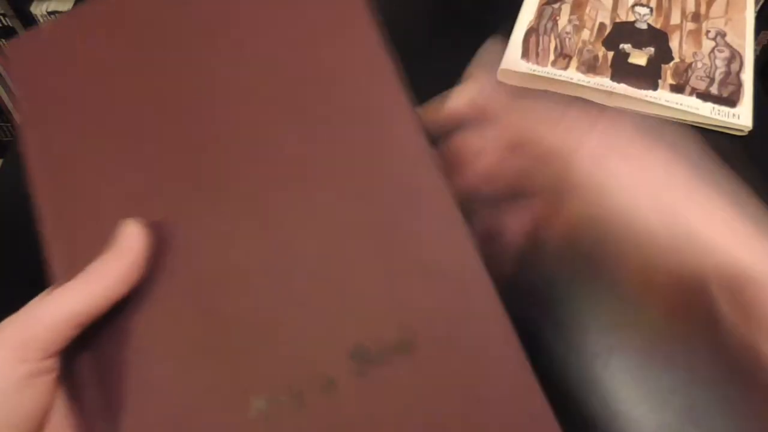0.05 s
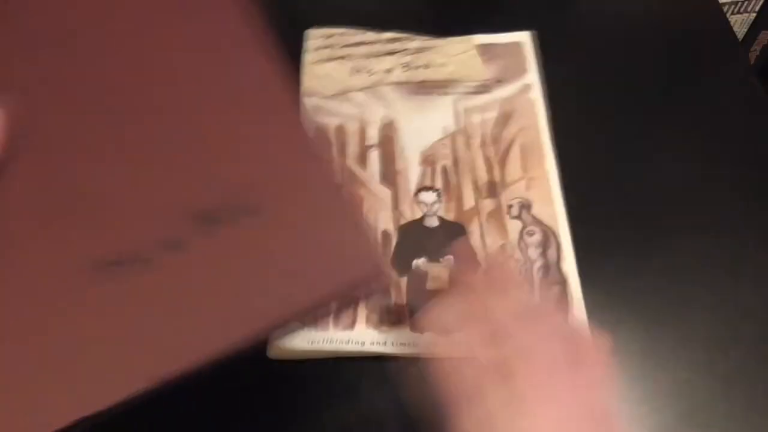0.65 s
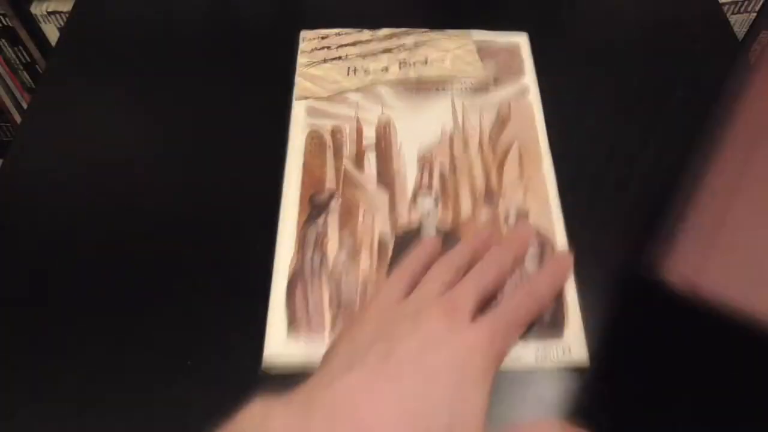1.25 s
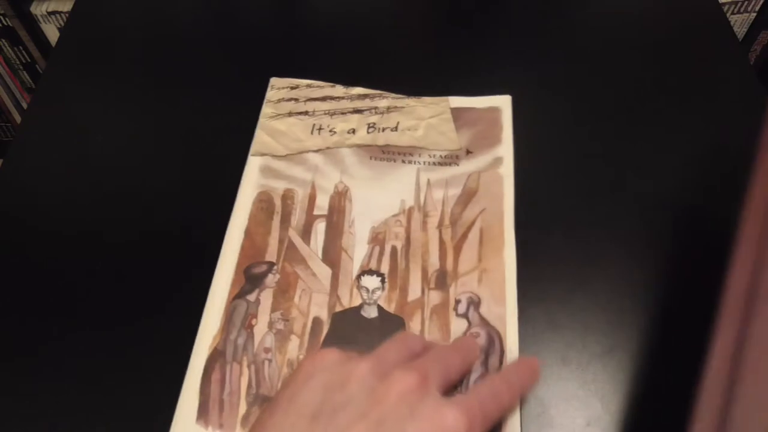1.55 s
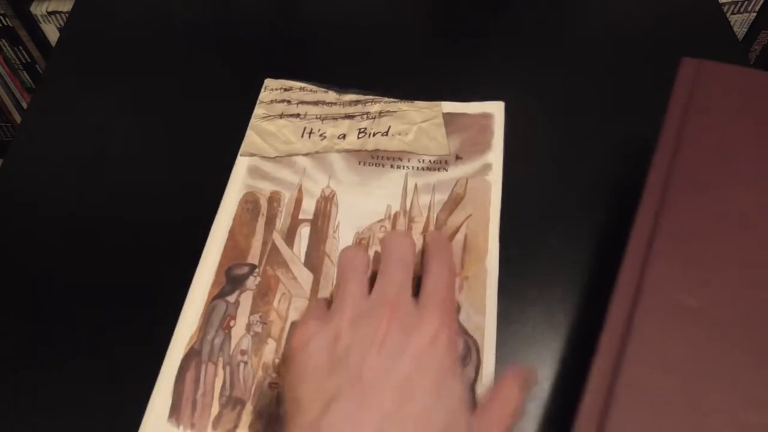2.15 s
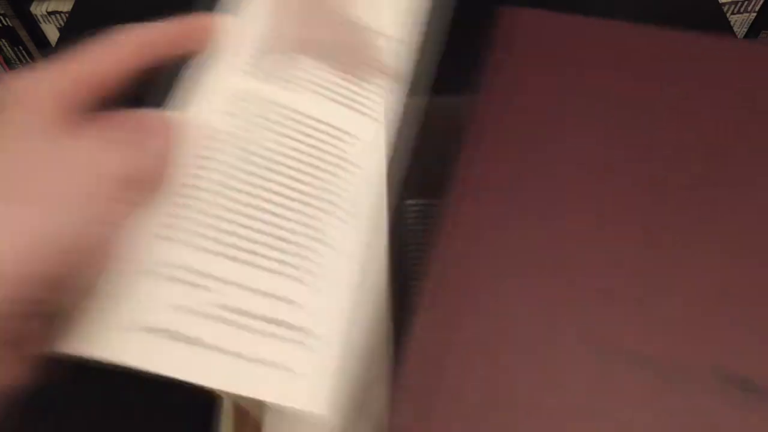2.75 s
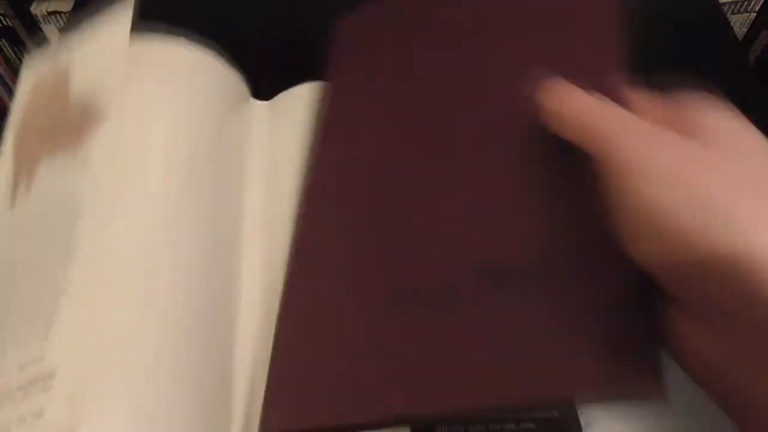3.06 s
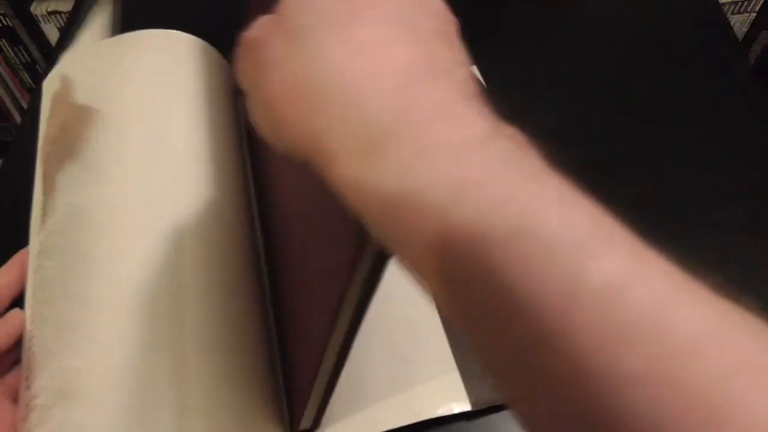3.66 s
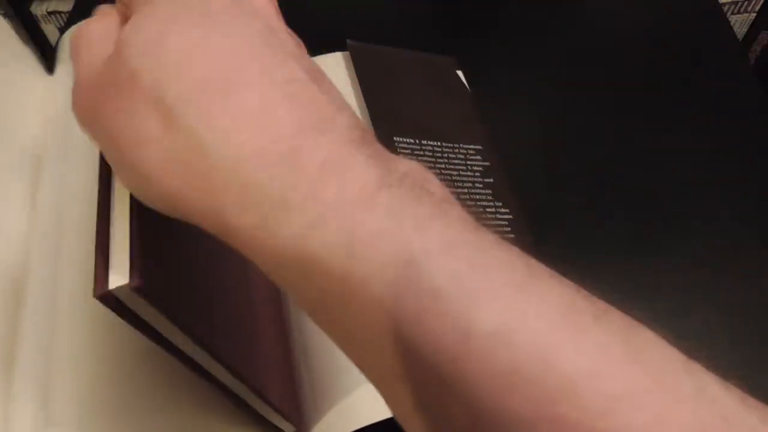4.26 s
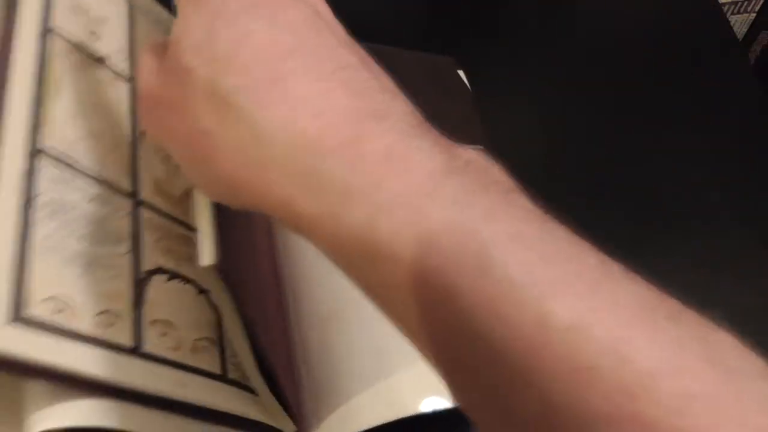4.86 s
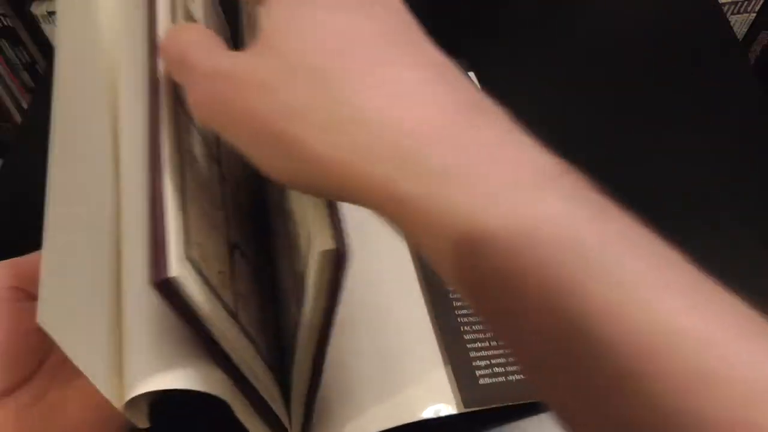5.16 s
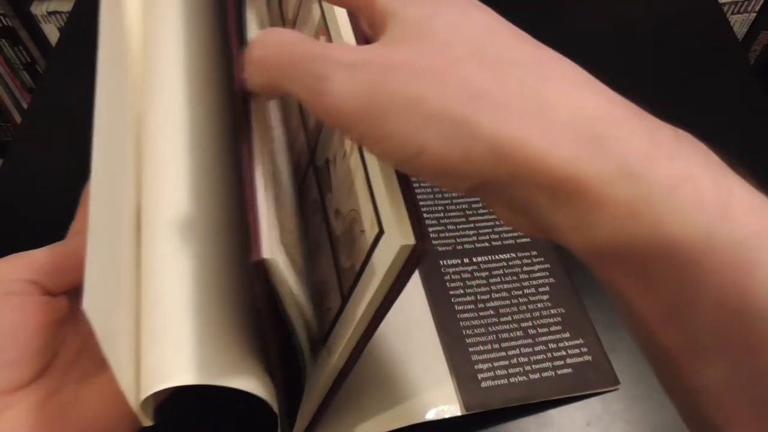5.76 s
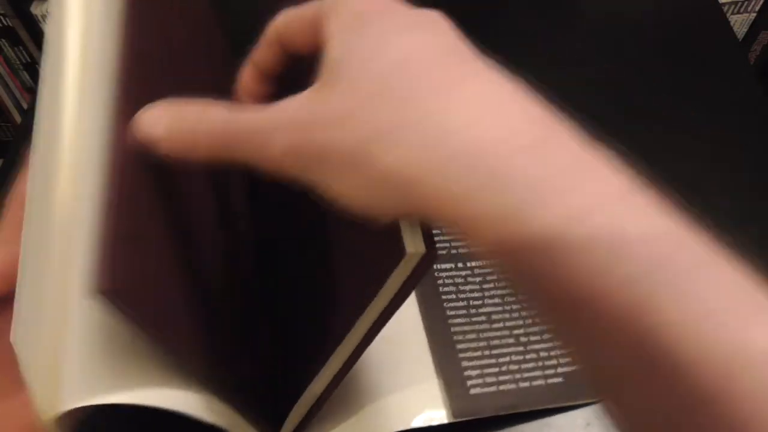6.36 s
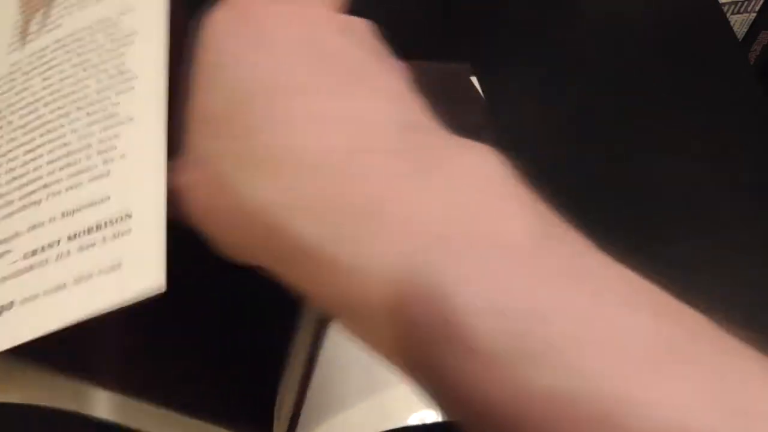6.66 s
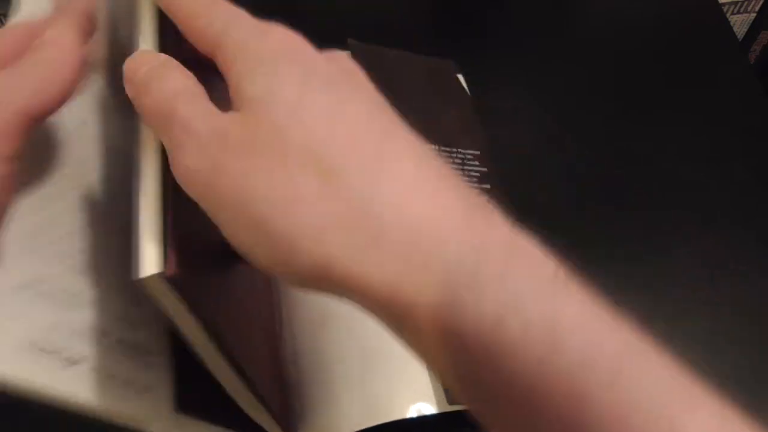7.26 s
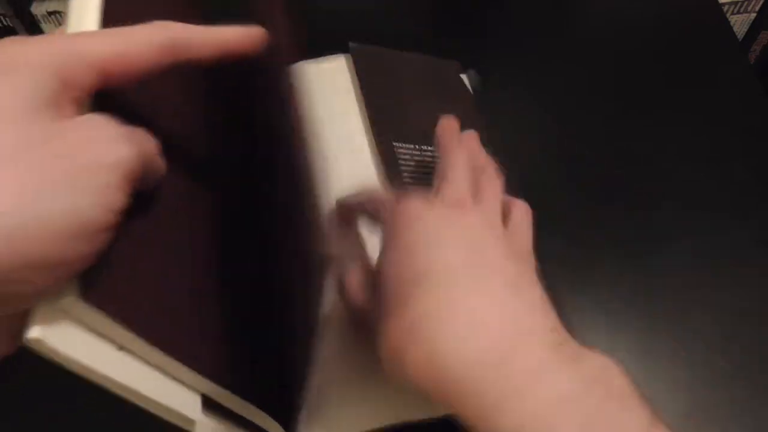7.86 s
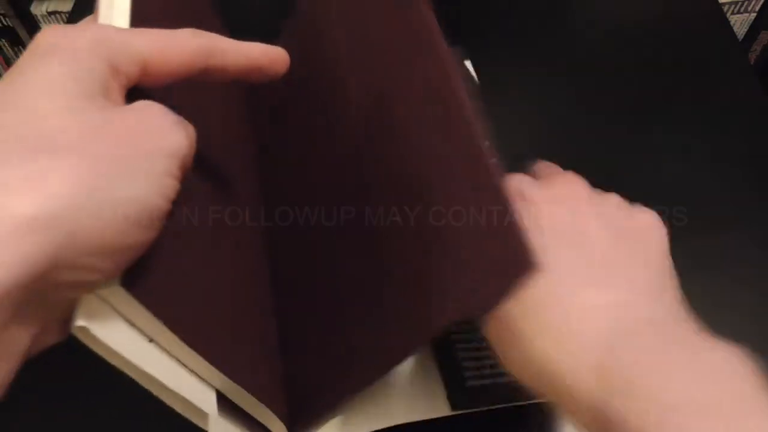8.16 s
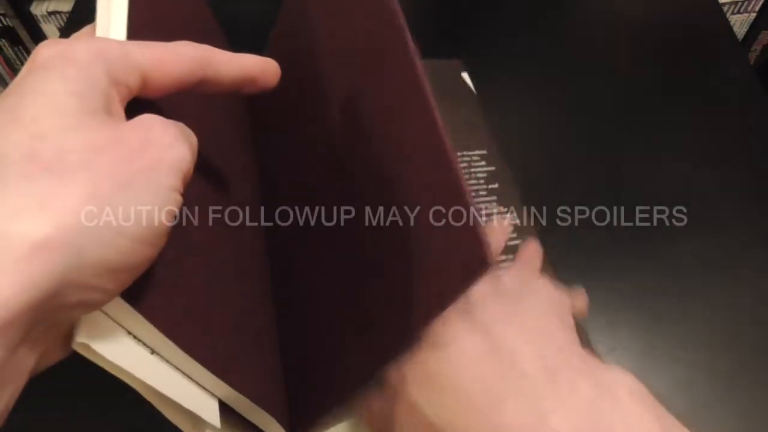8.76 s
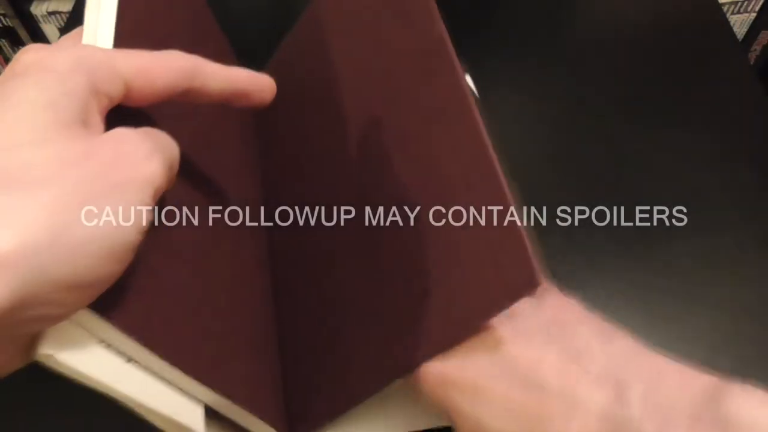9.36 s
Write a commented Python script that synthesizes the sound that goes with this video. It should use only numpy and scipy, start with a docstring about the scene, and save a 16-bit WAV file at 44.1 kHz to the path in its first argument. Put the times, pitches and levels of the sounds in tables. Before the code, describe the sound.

Close to the microphone in a small, quiet room, hands handle a hardcover book and its glossy paper jacket. Three short, bright swishes come first, mixed with sharp snaps and soft bumps on the table. A softer stretch of rubbing boards, whispering fingertips and occasional knocks follows, with one thin, high tick. Near the end the covers clack more loudly in two bunches while paper cracks, settling into light rustling.

```python
"""A snap of paper, a brush of fingertips and a knock: two hands move a hardcover book about on a table
in a small quiet room. Sliding friction makes the glossy jacket swish, the boards rub and the pages
scrape. Impacts excite damped modes, heard as knocks of the covers and thuds of the table top.
Paper and spine snap as they let go, and the jacket's film ticks as it buckles."""
import sys
import numpy as np
from scipy import signal
from scipy.fft import rfft, irfft, next_fast_len
from scipy.io import wavfile
from scipy.ndimage import uniform_filter1d

SR = 44100
rng = np.random.default_rng(int(sys.argv[2]) if len(sys.argv) > 2 else 0)


def transcribe(signal):
    """Save signal, clipped to [-1, 1], as a 16-bit WAV file at the path in sys.argv[1]."""
    frames = np.atleast_2d(signal).T
    limited = np.clip(frames, -1, 1)
    pcm = np.round(limited * 32767).astype(np.int16)
    wavfile.write(sys.argv[1], SR, pcm)


N = 415422
TIME = np.arange(N) / SR
HIT_TIME = np.arange(16384) / SR

# Levels in the tables are relative: each source sets its own overall gain.
# light rubbing of hands that never hold the book quite still: time_s, level_db
STIRRING = [(0, -73.5), (0.85, -112), (1.7, -64), (2.15, -76), (2.75, -63.5), (3.0, -67.5), (3.65, -60),
            (4.15, -67), (4.42, -70.5), (4.9, -62.5), (5.5, -71.5), (6.2, -76.5), (6.65, -54.5),
            (7.45, -63.5), (7.66, -69.5), (8.25, -71), (8.6, -58.5), (9.41, -66)]
# fingers sweep over paper: peak_s, level_db, rise_s, fall_s, edges_relative_db
FINGER_SWIPES = [(0.033, -45, 0.0068, 0.016, -32), (0.112, -51, 0.061, 0.029, -8.5),
                 (0.24, -67, 0.058, 0.079, -6), (1.005, -60, 0.018, 0.056, -15),
                 (1.89, -50.5, 0.061, 0.045, 1), (1.982, -49, 0.028, 0.04, 3), (2.23, -51, .026, 0.089, -8),
                 (2.575, -54.5, 0.089, 0.044, -0.5), (2.86, -44.5, 0.058, 0.081, -4.5),
                 (3.025, -56, 0.037, 0.028, 3), (3.75, -48.5, 0.092, 0.069, -3),
                 (4.055, -57, 0.023, 0.026, -15), (6.64, -65, 0.021, 0.018, 9),
                 (6.73, -61.5, 0.057, 0.025, 10), (6.86, -57, 0.02, 0.092, 0),
                 (7.168, -51, 0.04, 0.014, 1.5), (7.26, -54.5, 0.068, 0.042, -7.5),
                 (7.41, -56.5, 0.026, 0.03, -31), (7.56, -58, 0.033, 0.024, -10),
                 (7.75, -56.5, 0.024, 0.038, -1), (8.165, -57.5, 0.043, 0.028, 1.5),
                 (8.465, -59.5, 0.039, 0.071, -20), (8.67, -58.5, 0.094, 0.049, -2.5),
                 (8.91, -54, 0.1, 0.13, -22), (9.03, -56.5, 0.025, 0.064, -21),
                 (9.215, -52, 0.083, 0.039, -8.5), (9.31, -57.5, 0.088, 0.04, -4.5)]
# a board is pushed along the pages: peak_s, level_db, rise_s, fall_s, edges_relative_db
BOARD_PUSHES = [(1.06, -63, 0.12, 0.03, 6.5), (2.215, -60, 0.022, 0.051, 11),
                (2.42, -54.5, 0.028, 0.024, -8), (2.79, -61, 0.018, 0.051, 5),
                (3.085, -57.5, 0.03, 0.054, 4), (3.2, -52.5, 0.13, 0.15, -3),
                (3.335, -45, 0.12, 0.058, -1.5), (3.43, -53, 0.012, 0.099, -7),
                (3.56, -58, 0.032, 0.062, 4), (3.84, -49, 0.041, 0.035, -3), (4.025, -56, 0.19, 0.098, -5),
                (4.27, -53, 0.078, 0.041, -23), (4.695, -64, 0.041, 0.052, 3.5),
                (4.81, -58, 0.04, 0.068, -2.5), (5.015, -43, 0.053, 0.042, -10),
                (5.16, -55, 0.11, 0.068, -9.5), (5.82, -61, 0.047, 0.066, -4.5),
                (6.44, -46, 0.11, 0.092, -6), (6.74, -50.5, 0.032, 0.32, -11.5),
                (6.845, -46, 0.035, 0.013, -2), (6.995, -41, 0.052, 0.037, -10),
                (7.17, -51, 0.024, 0.054, -10), (7.325, -56, 0.041, 0.097, -32),
                (7.92, -57.5, 0.18, 0.13, -36), (8.14, -49, 0.11, 0.053, -12),
                (8.37, -53, 0.058, 0.051, -15), (8.51, -52, 0.035, 0.025, -22),
                (8.86, -51.5, 0.067, 0.086, -9.5), (8.985, -53, 0.1, 0.19, -4.5)]
# friction spectra, each with the columns: frequency_hz, density_db
EDGE_SPECTRUM = [(500, -11), (1500, 2.5), (1900, 0.5), (2250, 8.5), (2600, -1.5), (3000, 4), (3900, 4),
                 (4700, 3), (5700, -4.5), (7500, -2), (13000, -10), (15800, -47)]  # page edges
FINGER_SPECTRUM = [(1500, -71), (4000, -1.5), (5800, -3.5), (7000, 2), (8100, 2), (9000, -2.5), (10000, -3),
                   (12500, -2.5), (14000, -11), (15800, -25)]  # fingertips on paper
LIGHT_RUB_SPECTRUM = [(40, -17), (100, -7), (170, -2), (290, -2), (350, -7.5), (420, -0.5), (510, -11),
                      (630, -4.5), (860, -3), (1350, -8.5), (1800, -12), (2600, -18), (6000, -47)]  # a lightly touched board
PUSH_SPECTRUM = [(40, -16), (170, -10), (290, -4), (420, -5), (520, -10), (630, -2.5), (860, -0.5),
                 (1050, -2.5), (1380, -3.5), (1800, -10), (2600, -17), (6000, -50)]  # a pushed board
GLOSS_SPECTRUM = [(100, -26), (600, -12), (1200, -16.5), (2200, -11), (3300, 1), (4700, 3.5), (6000, -1.5),
                  (7400, 1.5), (10500, -11), (15800, -30)]  # sliding glossy paper
SHEEN_SPECTRUM = [(7000, -28), (9300, -3), (10700, 1.5), (12400, -0.5), (14000, -10), (15800, -23)]  # its film gliding lightly
RASP_SPECTRUM = [(200, -34), (700, -14.5), (1200, 2), (1700, -2), (2200, 4), (2700, -0.5), (3400, 2.5),
                 (4300, 1.5), (6000, -6), (15000, -25)]  # the same paper pressed down
SCUFF_SPECTRUM = [(300, -88), (1000, 1.5), (2200, 0.5), (3800, 1.5), (5500, -7.5), (7400, -1), (9000, -5),
                  (12500, -9), (15800, -26)]  # scuffs and crinkles
# modes of the bound boards: frequency_hz, level_db, free_t60_s
BOARD_MODES = [(279, 2.5, 0.28), (435, -3, 0.066), (575, 1.5, 0.026), (696, -2.5, 0.081), (848, 1, 0.051),
               (977, -2.5, 0.036), (1075, -7, 0.1), (1292, -1, 0.029), (1447, -12, 0.056), (1440, 0, 0.026),
               (2010, -2, 0.042), (3430, 3, 0.022)]
# the hollow between the boards as they open and shut: time_s, resonance_hz
HOLLOW_RESONANCE = [(2.8, 1140), (3.35, 1440), (4.05, 1140), (4.8, 870), (5.05, 920), (5.85, 970),
                    (6.45, 1190), (6.85, 870), (7.3, 1000), (8.1, 910), (8.5, 880), (9.0, 1200)]
# paper and spine snap on their own: start_s, level_db, centre_hz
SNAPS = [(0.0323, -31.5, 7100), (0.3745, -51, 3000), (0.9448, -48.5, 6600), (1.0368, -35.5, 3770),
         (1.348, -40, 6000), (1.3555, -35, 7500), (1.673, -46, 11000), (1.8235, -26.5, 8400),
         (1.83, -43, 7500), (2.0305, -38, 3500), (2.1908, -40.5, 2090), (2.522, -43, 4500),
         (4.519, -57, 2000), (5.344, -58, 2000), (5.573, -52, 900), (6.068, -55, 1500), (6.942, -37, 3500),
         (6.9885, -29, 5700), (7.1798, -33.5, 3520), (7.804, -38.5, 6700), (8.0227, -32.5, 8300),
         (8.419, -44, 7900), (8.4453, -34, 7460), (8.617, -38.5, 5900), (8.852, -37, 10500)]
# treble roll-off of cracking paper: frequency_hz, gain_db
PAPER_ROLLOFF = [(12800, 11), (15800, -13)]
# a board lands, shakes the table and cracks the paper between:
# start_s, board_db, board_centre_hz, thud_db, thud_centre_hz, crack_db, muffled_above_hz
KNOCKS = [(0.0663, -39.5, 990, -36.5, 137, -65, 2000), (0.401, -42.5, 800, -47, 171, -62, 2000),
          (1.008, -42.5, 870, -42.5, 150, -41, 9000), (1.0373, -42.5, 820, -33.5, 120, -47, 12000),
          (1.156, -54, 1000, -55, 245, -57.5, 8930), (2.635, -42, 1050, -59, 298, -54, 8900),
          (2.77, -49, 1090, -54, 200, -58, 4000), (3.061, -41, 915, -42.5, 201, -34.5, 4460),
          (3.295, -34.5, 1200, -37.5, 168, -33, 3000), (3.423, -45, 750, -42, 333, -36.5, 6040),
          (4.7395, -37.5, 1020, -54, 302, -34, 4460), (4.797, -43.5, 820, -60, 300, -53, 6000),
          (5.637, -52.5, 860, -50.5, 135, -55, 8000), (5.959, -47.5, 876, -43.5, 154, -56, 9000),
          (6.591, -44.5, 1270, -43.5, 380, -44, 8000), (6.853, -31, 633, -41, 304, -54, 3000),
          (6.953, -36, 734, -41, 130, -30, 12000), (6.994, -27.5, 1290, -34.5, 400, -21.5, 12000),
          (7.029, -38.5, 780, -47, 380, -54, 4000), (7.297, -47, 830, -43.5, 100, -62, 6000),
          (7.9732, -29.5, 1120, -39.5, 430, -30.5, 14000), (8.036, -35, 730, -39, 300, -66, 3000),
          (8.047, -23, 1110, -35, 364, -23, 9200), (8.302, -39.5, 755, -51, 205, -49, 8000),
          (8.339, -30.5, 774, -37, 390, -37, 10200), (8.419, -44, 1100, -54, 300, -43, 8000),
          (8.445, -40, 770, -56, 200, -60, 6000), (8.489, -37, 740, -47, 404, -39, 9000),
          (8.852, -27.5, 720, -36, 250, -36.5, 4970), (9.025, -39.5, 1130, -46, 119, -55, 3000)]
# soft blows of a hand or the book's weight: start_s, level_db, centre_hz, drag_s
THUDS = [(0.394, -36, 326, 0.016), (0.727, -53, 280, 0.046), (1.352, -40, 357, 0.014),
         (1.574, -53.5, 300, 0.0097), (1.825, -40.5, 423, 0.013), (1.828, -44, 100, 0.0028),
         (2.194, -47, 278, 0.019), (2.234, -47.5, 310, 0.064), (2.368, -53, 418, 0.02),
         (2.405, -41.5, 374, 0.017), (2.496, -51, 400, 0.015), (2.79, -48, 140, 0.052),
         (2.837, -45.5, 304, 0.0098), (3.061, -43, 58, 0.021), (3.683, -46, 170, 0.037),
         (3.78, -41.5, 187, 0.0064), (4.494, -46.5, 243, 0.0087), (4.522, -47, 110, 0.0053),
         (4.618, -52.5, 300, 0.0047), (4.865, -49, 202, 0.028), (5.155, -43.5, 93, 0.004),
         (6.23, -51.5, 297, 0.062), (6.609, -47, 100, 0.018), (7.002, -40, 99, 0.0091),
         (8.18, -52, 80.5, 0.01), (8.585, -43.5, 337, 0.036), (9.102, -49, 79.5, 0.015),
         (9.336, -57, 199, 0.029)]
# modes of the table top with the book on it: frequency_hz, level_db, free_t60_s
TABLE_MODES = [(54, 0, 0.16), (78, 5, 0.082), (107, 10, 0.074), (142, 5.5, 0.14), (178, 5.5, 0.14),
               (227, -2.5, 0.05), (279, 5, 0.32), (328, 3, 0.07), (412, 3, 0.25), (572, 4, 0.067),
               (642, -4, 0.22)]
# the loose cover bounces on the pages: start_s, level_db
COVER_BOUNCES = [(0.0686, -31.5), (0.0751, -49), (0.0934, -62), (1.059, -47), (6.852, -39.5), (6.998, -33)]
# the jacket slides, one table a stroke: time_s, level_db, rasp_weight_db, sheen_weight_db
JACKET_SLIDES = [
    [(0.37, -85, 0, -6), (0.375, -69.5, 10.5, 4), (0.424, -43, -12.5, 1), (0.498, -39.5, -15.5, 6.5),
     (0.592, -38, -17, 6.5), (0.606, -31.5, -21.5, 0), (0.688, -36, -15.5, -1), (0.77, -50.5, -7, -6),
     (0.84, -89, 9, -2)],
    [(1.344, -100, -16, 0), (1.349, -60.5, 9.5, 5), (1.381, -42.5, -12, -3.5), (1.48, -39, -17.5, -1.5),
     (1.569, -34.5, -20, -7.5), (1.595, -48, -5, -4), (1.643, -61, -1, 1), (1.707, -60.5, -11, -1),
     (1.731, -76, -2, -2)],
    [(2.62, -59, -7, -5), (2.674, -35, -11.5, -10), (2.696, -34, -13.5, -2), (2.728, -39.5, -7.5, 4.5),
     (2.738, -50, -3, -10), (2.77, -65, -5, -3)],
]
# brightness of the hiss of each slide: tilt_db_per_octave
SLIDE_TILTS = [3, 5, 5]
# paper scuffs over cloth: peak_s, level_db, rise_s, fall_s, tilt_db_per_octave
SCUFFS = [(1.046, -49.5, 0.016, 0.023, 9), (1.827, -38.5, 0.0088, 0.0052, 0),
          (3.35, -37.5, 0.048, 0.03, -7), (3.428, -42, 0.0064, 0.012, -5.5),
          (6.964, -38.5, 0.0082, 0.016, -0.5), (6.993, -34, 0.016, 0.0044, 3),
          (8.07, -33, 0.0028, 0.004, -1), (8.449, -53, 0.006, 0.02, 1), (8.984, -38, 0.013, 0.011, 3.5)]
# the glossy film buckles: start_s, level_db
FILM_TICKS = [(2.081, -55), (4.634, -52), (5.155, -50), (5.9596, -27), (8.275, -55)]
# spectrum of that buckling: frequency_hz, density_db
TICK_SPECTRUM = [(3000, -22), (6000, -23), (8000, -8), (10000, -3), (12000, 3), (13200, 0), (15500, -28)]
# where the book lies: time_s, left_minus_right_db
BOOK_POSITION = [(0.0, 2.5), (0.5, -1.5), (2.25, 1), (2.65, -4.5), (3.15, 2.5), (4.4, 0), (4.62, 4.5),
                 (5.04, 0.5), (5.87, 2), (6.38, 0.5), (6.9, 3), (7.3, 1.5), (8.5, -1.5)]
# likeness of the two channels: frequency_hz, coherence
COHERENCE = [(100, 0.7), (3000, 1), (6000, 1), (8000, 0.54), (11000, 0.094), (15000, 0.91)]
# phase between the two channels: frequency_hz, left_lead_rad
PHASE_LEAD = [(100, 0.78), (1500, 0.12), (4500, -0.64), (7500, -0.038), (12000, -0.39)]
# reverberation time of the room: frequency_hz, t60_s
ROOM_DECAY = [(100, 0.023), (280, 0.25), (800, 0.18), (2000, 0.066), (5000, 0.12), (14000, 0.06)]
# the quiet room and the microphone's hiss: frequency_hz, density_db
QUIET_SPECTRUM = [(25, -20), (76, -13.5), (135, -6), (220, -7), (500, -12), (1500, -16.5), (2000, -23),
                  (2590, -26.5), (5670, -32.5), (8730, -23.5), (15800, -29)]

BAND_EDGE_HZ = 15850


def amp(db):
    """Amplitude grows tenfold for every 20 dB."""
    return 10 ** (np.asarray(db) / 20)


def unit(x):
    """Normalisation to an rms of one."""
    return x / np.sqrt(np.mean(x ** 2) + 1e-20)


def unit_peak(x):
    """Normalisation to an rms of one over the loudest four milliseconds."""
    power = uniform_filter1d(np.atleast_2d(x) ** 2, size=176).mean(0)
    return x / np.sqrt(power.max() + 1e-20)


def read(points, hz):
    """Interpolation of a table on a logarithmic frequency axis."""
    frequency_hz, value = np.transpose(points)
    return np.interp(np.log(hz + 1), np.log(frequency_hz + 1), value)


def add(mix, start_s, sound):
    """Superposition: a sound adds to both channels from its start on."""
    part = mix[:, max(round(start_s * SR), 0):][:, :sound.shape[-1]]
    part += sound[..., :part.shape[1]]


def decay(t60_s, t=HIT_TIME):
    """Damping: free vibration falls exponentially, by 60 dB in t60_s."""
    return np.exp(-np.log(1000) * t / t60_s)


def onset(rise_s):
    """A force that builds over a finite time rounds the attack."""
    return 1 - np.exp(-HIT_TIME / rise_s)


def hit_noise():
    """Two uncorrelated white noises, long enough for one impact."""
    return rng.standard_normal((2, len(HIT_TIME)))


def wobble(rate_hz, size):
    """Low-passed noise gives slow random motion of unit rms."""
    rolloff = 1 + (np.fft.rfftfreq(size, 1 / SR) / rate_hz) ** 2
    return unit(irfft(rfft(rng.standard_normal(size)) / rolloff, size))


def two_ports(drive, spectrum, tilt_db=0):
    """Partial coherence: two drives are filtered and blended as two close microphone ports hear them."""
    size = drive.shape[1]
    hz = np.fft.rfftfreq(size, 1 / SR)
    left, unrelated = rfft(drive)
    coherence = np.clip(read(COHERENCE, hz), -1, 1)
    right = (coherence * left + np.sqrt(1 - coherence ** 2) * unrelated) * np.exp(-1j * read(PHASE_LEAD, hz))
    low_cut = hz ** 2 / (hz ** 2 + spectrum[0][0] ** 2)  # small surfaces radiate no deep bass
    gain = amp(read(spectrum, hz) + tilt_db * np.log2(hz + 1))
    return unit(irfft(np.array([left, right]) * low_cut * gain, size))


def friction(spectrum, judder_db, judder_hz, catches_per_s, catch_db, tilt_db=0, size=N):
    """Stick-slip friction: countless tiny slips swell as the contact judders; a few fibres catch."""
    n = next_fast_len(size, True)
    slips = rng.standard_normal((2, n))
    caught = rng.random(n) < catches_per_s / SR
    catches = caught * np.minimum(rng.exponential(1, n), 3) * rng.choice([-1, 1], (2, n))
    judder = amp(judder_db * wobble(judder_hz, n))
    drive = (slips + amp(catch_db) * unit(catches)) * judder
    return two_ports(drive, spectrum, tilt_db)[:, :size]


def wander(x, depth_db, span_hz, span_s):
    """A travelling contact is a changing filter: broad resonances come and go."""
    hz, when, spectra = signal.stft(x, SR, nperseg=512)
    field = rng.standard_normal(spectra.shape[1:])
    for axis, cells in enumerate([span_hz / hz[1], span_s / when[1]]):
        for _ in range(2):
            field = uniform_filter1d(field, max(round(cells), 1), axis=axis)
    drifting = signal.istft(spectra * amp(depth_db * unit(field)), SR, nperseg=512)[1]
    return unit(drifting[:, :x.shape[1]])


def stirring():
    """Amplitude envelope of the light rubbing between strokes."""
    return amp(np.interp(TIME, *np.transpose(STIRRING)))


def strokes(rows, edges=False):
    """Friction follows speed: each stroke, or the page edges it drags, has a bell-shaped envelope."""
    t = TIME[::64]
    power = np.zeros(len(t))
    for peak_s, level_db, rise_s, fall_s, edges_db in rows:
        from_peak = np.maximum((peak_s - t) / rise_s, (t - peak_s) / fall_s)
        bell = np.exp(-abs(from_peak) ** 2.54)
        power += (amp(level_db + edges * edges_db) * bell) ** 2
    return np.interp(TIME, t, np.sqrt(power))


def together(*gains):
    """Incoherent sources add in power."""
    return np.sqrt(sum(gain ** 2 for gain in gains))


def quiet_room():
    """The noise floor: steady random noise of the room and the microphone."""
    gain = amp(read(QUIET_SPECTRUM, np.fft.rfftfreq(N, 1 / SR)))
    return amp(-64.5) * unit(irfft(rfft(rng.standard_normal((2, N))) * gain, N))


def pages():
    """Friction on paper: page edges scrape with a dry grain and fingertips whisper."""
    scrape = friction(EDGE_SPECTRUM, judder_db=2.0, judder_hz=58.7, catches_per_s=410, catch_db=-14)
    skin = friction(FINGER_SPECTRUM, judder_db=2.5, judder_hz=57.0, catches_per_s=77, catch_db=-16)
    scrape, skin = (wander(x, depth_db=2.9, span_hz=700, span_s=0.05) for x in (scrape, skin))
    edges = together(strokes(BOARD_PUSHES, edges=True), strokes(FINGER_SWIPES, edges=True),
                     amp(-11) * stirring())
    fingers = together(strokes(FINGER_SWIPES), amp(-22.5) * strokes(BOARD_PUSHES), amp(-5) * stirring())
    return amp(-1.5) * scrape * edges + amp(-1.0) * skin * fingers


def over_boards(spectrum, hollow_db, hollow_octaves=0.25):
    """Resonance: the boards' modes and the hollow between them filter the rub of cloth and paper."""
    rub = friction(spectrum, judder_db=2.1, judder_hz=22.2, catches_per_s=80, catch_db=-8.5)
    hz, when, spectra = signal.stft(rub, SR, nperseg=2048)
    resonances = sum(1 / (1 + ((hz - mode_hz) * t60_s) ** 2) for mode_hz, _, t60_s in BOARD_MODES)
    board_gain = np.sqrt(amp(-8.5) + resonances)[:, None]
    octaves_off = np.log2((hz[:, None] + 1) / np.interp(when, *np.transpose(HOLLOW_RESONANCE)))
    hollow_gain = amp(hollow_db * np.exp(-(octaves_off / hollow_octaves) ** 2))
    return unit(signal.istft(spectra * hollow_gain * board_gain, SR, nperseg=2048)[1][:, :N])


def board_rubs():
    """Forced vibration: a pushed board rasps, while light contact gives a fuller, softer rub."""
    pushed = over_boards(PUSH_SPECTRUM, hollow_db=4.0) * strokes(BOARD_PUSHES)
    light_contact = together(amp(-12.5) * strokes(FINGER_SWIPES), stirring())
    return pushed + over_boards(LIGHT_RUB_SPECTRUM, hollow_db=2.0) * light_contact


def crinkles(creases_per_s=29, spread_db=4.5):
    """A Poisson process: tiny creases give way at random, louder the more the book is stirred."""
    gives_way = rng.random(N) < creases_per_s / SR
    clicks = gives_way * amp(spread_db * np.minimum(rng.exponential(1, N), 2))
    flutter = signal.oaconvolve(clicks, decay(t60_s=0.02))[:N]
    return amp(-8.5) * stirring() * two_ports(rng.standard_normal((2, N)) * flutter, SCUFF_SPECTRUM)


def muffling_db(hz, top_hz, db_per_octave=7):
    """Absorption: closed pages swallow the treble above top_hz."""
    return -db_per_octave * np.maximum(np.log2(hz / top_hz), 0)


def snaps(crack_hz=2280):
    """Sudden release of strain: stiff paper cracks, then flutters; high snaps have a narrower band."""
    out = np.zeros((2, N))
    hz = np.geomspace(500, 16000, num=21)
    envelope = onset(rise_s=0.00039) * (decay(t60_s=0.019) + amp(-9) * decay(t60_s=0.0017))
    in_the_open = [(*row, BAND_EDGE_HZ) for row in SNAPS]
    under_boards = [(start_s, crack_db, crack_hz, top_hz) for start_s, *_, crack_db, top_hz in KNOCKS]
    for start_s, level_db, centre_hz, top_hz in in_the_open + under_boards:
        db_per_octave = 6.0 * max(centre_hz / 4500, 1)
        band_db = -db_per_octave * abs(np.log2(hz / centre_hz))
        spectrum = np.transpose([hz, band_db + read(PAPER_ROLLOFF, hz) + muffling_db(hz, top_hz)])
        add(out, start_s, amp(level_db) * unit_peak(two_ports(hit_noise(), spectrum) * envelope))
    return amp(-6.5) * out


def strike(modes, centre_hz, t60_factor, db_per_octave, scatter_db, detune):
    """Modal ringing: a blow favours the modes near centre_hz, and the hands shorten their decay."""
    hz, level_db, free_t60_s = np.transpose(modes)[:, :, None]
    weight, shift, polarity = rng.standard_normal((3, len(modes), 1))
    mode_db = level_db - db_per_octave * abs(np.log2(hz / centre_hz)) - scatter_db * weight
    tones = np.sign(polarity) * np.sin(2 * np.pi * hz * (1 + detune * shift) * HIT_TIME)
    return unit_peak((amp(mode_db) * decay(free_t60_s * t60_factor) * tones).sum(0))


def knocks():
    """Hard impact: a short contact rings the boards; cardboard's crowd of damped modes adds a clack."""
    out = np.zeros((2, N))
    hz = np.geomspace(100, 16000, num=30)
    for start_s, level_db, centre_hz, *_ in KNOCKS:
        ring = strike(BOARD_MODES, centre_hz, t60_factor=0.7, db_per_octave=15.0,
                      scatter_db=3.2, detune=0.032)
        band_db = -22 * abs(np.log2(hz / centre_hz))
        spectrum = np.transpose([hz, band_db + muffling_db(hz, top_hz=1620)])
        clack = unit_peak(two_ports(hit_noise(), spectrum) * decay(t60_s=0.037))
        knock = (ring + amp(-2.5) * clack) * onset(rise_s=0.00031)
        add(out, start_s, amp(level_db) * unit_peak(knock))
    return amp(-1.1) * out


def thuds(board_drag_s=0.0022, low_cut_hz=61.4):
    """Soft impact: a dragging blow drives the table's modes and squeezes air from under the book."""
    out, t = np.zeros((2, N)), HIT_TIME
    under_boards = [(start_s, db, hz, board_drag_s) for start_s, _, _, db, hz, *_ in KNOCKS]
    for start_s, level_db, centre_hz, drag_s in THUDS + under_boards:
        ring = strike(TABLE_MODES, centre_hz, t60_factor=0.51, db_per_octave=15.5,
                      scatter_db=0.0, detune=0.012)
        drag_force = rng.standard_normal(len(t)) * np.exp(-t / drag_s)
        dragged = unit_peak(signal.fftconvolve(ring, drag_force)[:len(t)])
        air_spectrum = [(centre_hz / 2, -2), (centre_hz, 0), (1000, -12), (3000, -45)]
        puff = two_ports(hit_noise(), air_spectrum) * np.exp(-t / (drag_s + 0.011))
        thud = (ring + amp(1) * dragged + amp(-5) * puff) * onset(rise_s=0.0022)
        add(out, start_s, amp(level_db) * unit_peak(thud))
    low_cut = signal.butter(2, low_cut_hz, "highpass", fs=SR, output="sos")
    return amp(-3.5) * signal.sosfilt(low_cut, out)


def cover_chatter(pitch_hz=944):
    """A damped oscillator: each light bounce of the cover sounds the same short hollow note."""
    out = np.zeros((2, N))
    note = np.sin(2 * np.pi * pitch_hz * HIT_TIME) * decay(t60_s=0.035) * onset(rise_s=0.00058)
    for start_s, level_db in COVER_BOUNCES:
        add(out, start_s, amp(level_db) * unit_peak(note))
    return out


def jacket_slides():
    """Sliding friction: glossy paper hisses, with a sheen where it glides and a rasp where pressed."""
    out = np.zeros((2, N))
    for rows, tilt_db in zip(JACKET_SLIDES, SLIDE_TILTS):
        time_s, *columns = np.transpose(rows)
        t = np.arange(time_s[0], time_s[-1], 1 / SR)
        level_db, rasp_db, sheen_db = (np.interp(t, time_s, column) for column in columns)
        hiss = friction(GLOSS_SPECTRUM, judder_db=0.7, judder_hz=120,
                        catches_per_s=3400, catch_db=-20, tilt_db=tilt_db, size=len(t))
        sheen = friction(SHEEN_SPECTRUM, judder_db=0.3, judder_hz=120,
                         catches_per_s=3000, catch_db=-14, size=len(t))
        rasp = friction(RASP_SPECTRUM, judder_db=1.5, judder_hz=90,
                        catches_per_s=640, catch_db=-26, size=len(t))
        hiss = wander(hiss, depth_db=1.5, span_hz=500, span_s=0.04)
        slide = hiss + amp(sheen_db) * sheen + amp(rasp_db + 3.5) * rasp
        add(out, time_s[0], amp(level_db) * slide)
    return out * amp([[-1.1], [1.1]])  # a little to the right


def scuffs():
    """Transient friction: paper slips over cloth in a grainy burst that swells and dies away."""
    out, t = np.zeros((2, N)), HIT_TIME
    for peak_s, level_db, rise_s, fall_s, tilt_db in SCUFFS:
        start_s = max(peak_s - np.pi * rise_s, 0)
        after_peak = start_s + t - peak_s
        swell = np.exp(-(np.minimum(after_peak, 0) / rise_s) ** 2 - np.maximum(after_peak, 0) / fall_s)
        slips = hit_noise()
        grain = amp(1.8 * unit(uniform_filter1d(rng.standard_normal(len(t)), size=30)))
        add(out, start_s, amp(level_db) * swell * two_ports(slips * grain, SCUFF_SPECTRUM, tilt_db))
    return out


def film_ticks(t60_s=0.003, lead_in_s=0.003):
    """Buckling: the glossy film gives way with one very short, very high crack."""
    out, t = np.zeros((2, N)), HIT_TIME - lead_in_s
    for start_s, level_db in FILM_TICKS:
        buckling = hit_noise() * (t > 0) * decay(t60_s, t)
        add(out, start_s - lead_in_s, amp(level_db) * unit_peak(two_ports(buckling, TICK_SPECTRUM)))
    return out


def room(direct, tail_db, near_db, echoes_per_s=4000):
    """Reflection: the table and near objects answer at once; the walls add a short reverberant tail."""
    t = HIT_TIME
    echoes = rng.choice([-1., 1.], (2, len(t))) * (rng.random((2, len(t))) < echoes_per_s / SR)
    hz, when, spectra = signal.stft(echoes * (t > .006), SR, nperseg=256)
    absorbed = spectra * decay(read(ROOM_DECAY, hz)[:, None], when)
    tail = signal.istft(absorbed, SR, nperseg=256)[1][:, :len(t)]
    tail = tail + 0.32 * tail[::-1]  # both ports hear part of the same echoes
    near = two_ports(hit_noise(), [(150, 0), (15000, 0)]) * (t > .001) * np.exp(-t / 0.0083)
    response = (amp(tail_db) * unit(tail) + amp(near_db) * unit(near)) / np.sqrt(len(t))
    return direct + signal.fftconvolve(direct, response, axes=1)[:, :N]


def scene():
    """Superposition of book, paper and film, each with its reflections, over the noise floor."""
    pan = amp(np.interp(TIME, *np.transpose(BOOK_POSITION)) * np.array([[.5], [-.5]]))
    book = room((board_rubs() + knocks() + cover_chatter() + thuds()) * pan, tail_db=-14.5, near_db=-10)
    paper = room(jacket_slides() + pages() + snaps() + scuffs() + crinkles(), tail_db=-14, near_db=-17.5)
    film = room(film_ticks(), tail_db=-17, near_db=-18)
    return book + paper + film + quiet_room()


def record(dry):
    """Band limiting: a steep low-pass filter removes the highest treble."""
    low_pass = signal.firwin(511, BAND_EDGE_HZ, window=("kaiser", 9), fs=SR)
    return signal.oaconvolve(dry, low_pass[None], "same")


dry = scene()
out = record(dry)
transcribe(out)
```